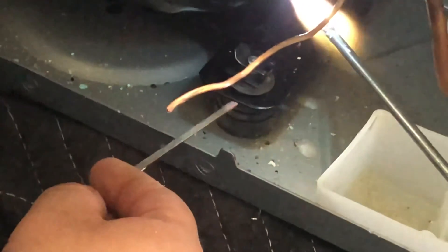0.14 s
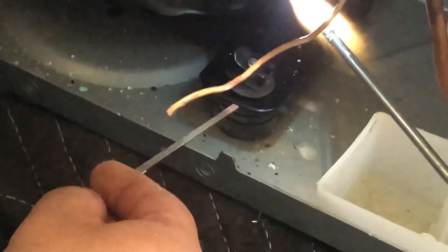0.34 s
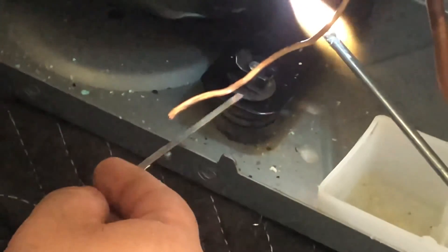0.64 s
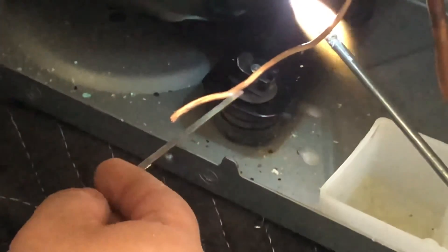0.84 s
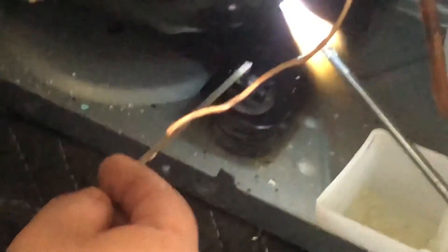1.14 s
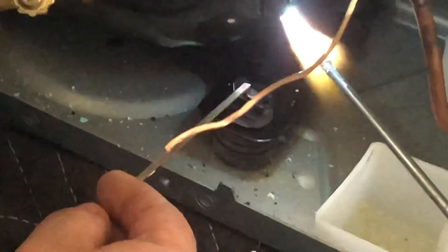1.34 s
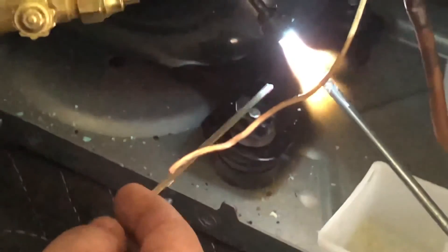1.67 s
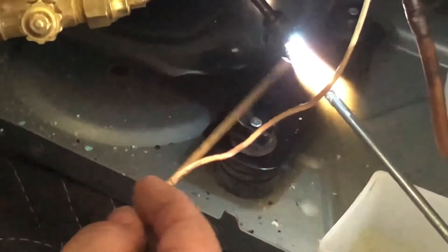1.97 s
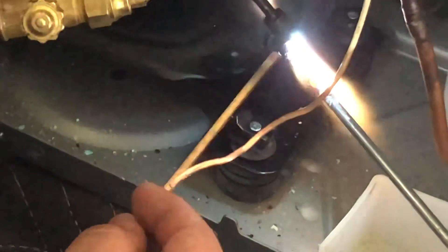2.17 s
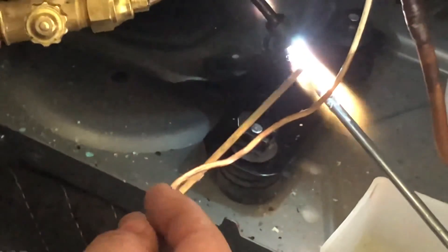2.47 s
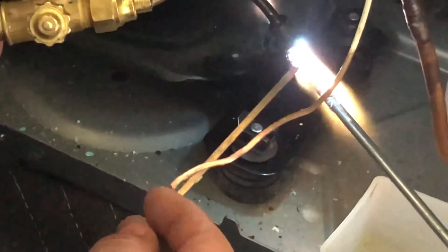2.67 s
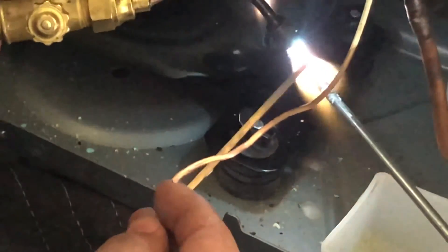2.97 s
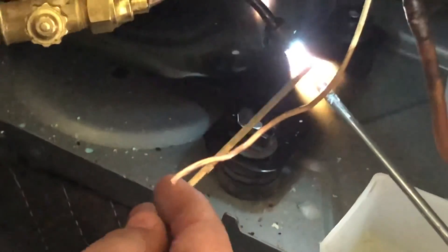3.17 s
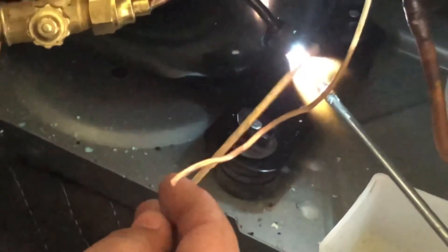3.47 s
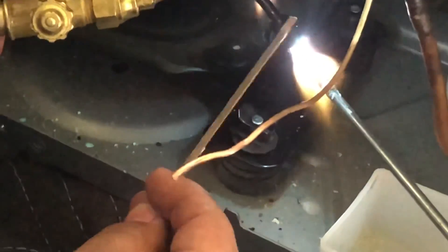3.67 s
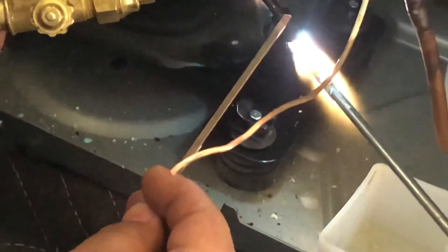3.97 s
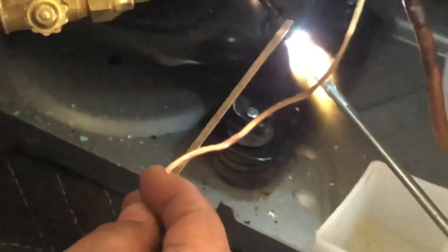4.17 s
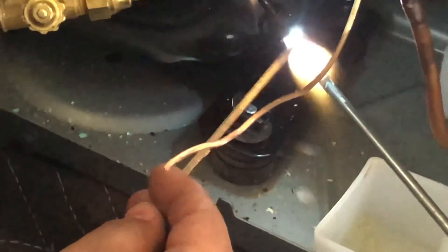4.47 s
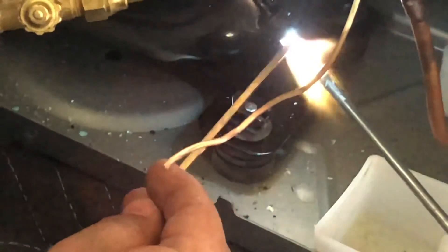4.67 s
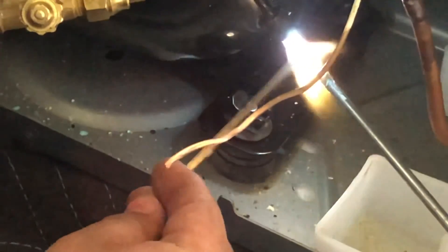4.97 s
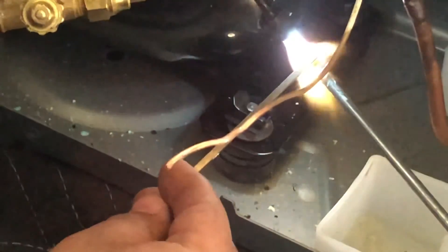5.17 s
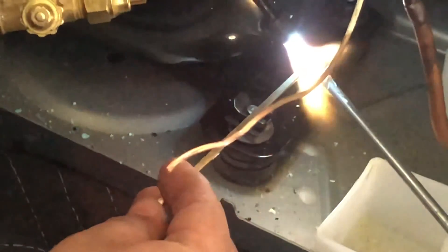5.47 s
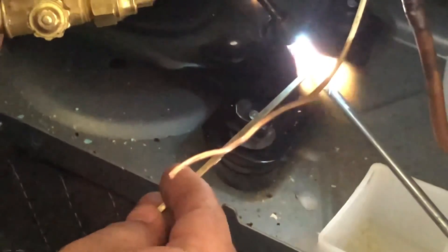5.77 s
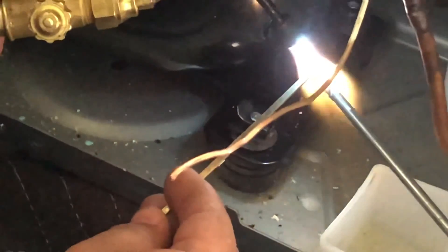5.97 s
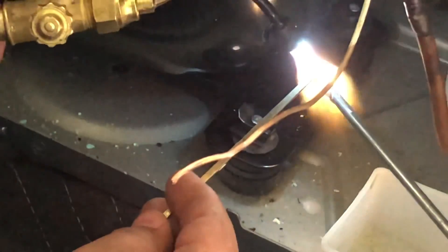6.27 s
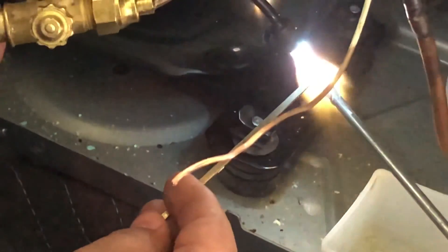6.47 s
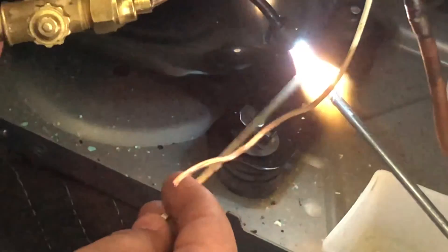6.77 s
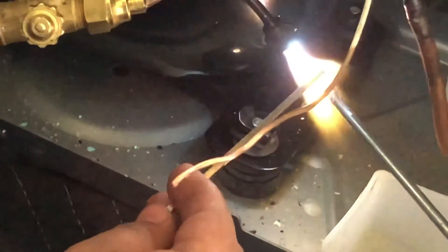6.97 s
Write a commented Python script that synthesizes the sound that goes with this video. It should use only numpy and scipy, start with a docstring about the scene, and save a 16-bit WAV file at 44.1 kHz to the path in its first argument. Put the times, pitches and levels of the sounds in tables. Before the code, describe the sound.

Close, steady rush of a gas torch inside a metal compartment, with a bright hiss that swells and shifts colour midway.

```python
"""Brazing torch in a steel compartment

A torch burns steadily inside a cooling unit, close up. The turbulent flame roars and rushes
through the compartment's resonances, and its gas jet hisses above them. The hiss flares and
changes colour as the flame is brought onto a copper pipe joint and a rod is fed into it."""
import sys
import numpy as np
from scipy import signal
from scipy.fft import rfft, irfft, next_fast_len
from scipy.io import wavfile

SR = 44100
rng = np.random.default_rng(int(sys.argv[2]) if len(sys.argv) > 2 else 0)


def generate_wav(signal):
    """Clip the signal to [-1, 1] and save it as 16-bit WAV at the path in sys.argv[1]."""
    frames = np.transpose(np.atleast_2d(signal))
    scaled = np.clip(frames, -1, 1) * 32767
    pcm = np.round(scaled).astype(np.int16)
    wavfile.write(sys.argv[1], SR, pcm)


N = 313551
FRAME, HOP = 2048, 512
SAMPLE_TIMES = np.arange(N) / SR
FRAME_TIMES = np.arange(N // HOP + 9) * HOP / SR
HZ = np.fft.rfftfreq(FRAME, 1 / SR)
TOP_HZ = 15780


def amp(db):
    """Decibels to gain."""
    return 10 ** (np.asarray(db) / 20)


def unit_rms(x):
    """Scales to rms 1."""
    return x / np.sqrt(np.mean(x ** 2) + 1e-20)


def follow(rows, times):
    """Each column of an automation curve, read at the given times."""
    seconds, *columns = np.transpose(rows)
    return [np.interp(times, seconds, column) for column in columns]


def wander(rate_hz, size):
    """Random drift of rms 1 across the scene, mostly slower than rate_hz."""
    padded = next_fast_len(size)
    hz = np.fft.rfftfreq(padded, N / SR / size)
    spectrum = rfft(rng.standard_normal(padded)) * (hz > 0) / (1 + (hz / rate_hz) ** 2)
    return unit_rms(irfft(spectrum, padded)[:size])


def resonances(modes):
    """Power spectrum of a set of steep-sided peaks."""
    return sum(amp(db) ** 2 / (1 + (2 * (HZ - hz) / width) ** 2) ** 2 for hz, width, db in modes)


def above(edge_hz, order):
    """Share of the power that a smooth high-pass lets through."""
    rise = (HZ / edge_hz + 1e-4) ** order
    return rise / (1 + rise)


def turbulence(power):
    """Noise of rms 1, coloured by a steady or frame-by-frame power spectrum."""
    real, imaginary = rng.standard_normal((2, len(FRAME_TIMES), len(HZ)))
    spectra = (real + 1j * imaginary) * np.sqrt(power / power.sum(-1, keepdims=True))
    _, noise = signal.istft(spectra.T, nperseg=FRAME, noverlap=FRAME - HOP)
    return unit_rms(noise[:N])


def comb(delay_s):
    """Ripple that a faint echo lays over the spectrum, one delay per frame."""
    return np.cos(np.outer(2 * np.pi * delay_s, HZ).astype(np.float32))


def wall_scatter(strength, shortest_s, longest_s, sway_s, sway_hz, count):
    """Power gain from many faint echoes off sheet metal, wavering as the hand sways the torch."""
    delays = np.linspace(shortest_s, longest_s, count) * rng.uniform(.9, 1.1, count)
    ripple = sum(comb(delay + sway_s * wander(sway_hz, size=len(FRAME_TIMES))) for delay in delays)
    return np.exp(2 * strength * ripple)


# Low resonances of compartment and bench. Each row: pitch in Hz, width in Hz, level in dB.
ROAR_MODES = [(79, 24, -11.5), (126, 33, -12), (183.7, 57, -2.7), (239.6, 51, -3), (307, 120, -13.5),
              (381.5, 32, -9.5), (449.7, 15.8, 0.0), (526.4, 45, -3), (621, 47, -8.5), (735, 116, -3.5),
              (798, 62, -6), (883, 99, -3), (1010.5, 26, -0.5), (1029, 128, -4), (1170, 44, -12.4),
              (1262, 35, -3), (1440, 166, -8.5), (1492, 86, -5), (1610, 42, -15)]
# How hard the flame burns. Each row: time in seconds, roar level in dB.
ROAR_LEVELS = [(0.0, -32.5), (2.89, -32), (3.66, -35.5), (3.95, -32), (4.67, -34.0), (6.32, -33),
               (6.54, -34.5), (7.1, -32.5)]


def roar(flutter_db=0.42):
    """Uneven burning in the flame booms in the compartment."""
    burn_db, = follow(ROAR_LEVELS, SAMPLE_TIMES)
    colour = resonances(ROAR_MODES) * above(60, order=10) * (1 - above(1600, order=40))
    return amp(burn_db + flutter_db * wander(27, size=N)) * turbulence(colour)


# Where the flame plays. Each row: time in seconds, share on the joint from 0 to 1,
# share of the remainder on the rod from 0 to 1.
FLAME_AIM = [(0.9, .02, .02), (1.38, 0, 0.2), (2.15, 0.13, 0.3), (2.97, 0, 0.6), (3.3, 0.6, .3),
             (3.6, 0.9, .3), (4.35, 0.77, .43), (4.76, 0.8, 0.7), (5.05, 0.14, 0.63), (5.95, 0, 0.92),
             (6.5, 0.34, 0.9), (7.1, 0.4, 0.5)]


def aim():
    """The flame's shares on the joint, on the rod and blowing free, frame by frame."""
    joint, rod = np.clip(follow(FLAME_AIM, FRAME_TIMES), 0, 1)[:, :, None]
    return joint, (1 - joint) * rod, (1 - joint) * (1 - rod)


# Midrange resonances that carry the rush. Each row: pitch in Hz, width in Hz, level in dB.
RUSH_MODES = [(1710, 180, -7.5), (1782, 97, -7.5), (1972, 115, -7.5), (2067, 143, -5.5), (2130, 46, -3.5),
              (2233, 230, -5), (2482, 150, -1), (2583, 36, -4), (2670, 280, -2.5), (3013, 176, 0),
              (3250, 106, -4), (3395, 150, -8.5), (3515, 41, -5), (3616, 160, -7), (4044, 420, -5.5)]
# The rush rides on the speed of the gases. Each row: time in seconds, level in dB.
RUSH_LEVELS = [(0.05, -25), (2.89, -23.5), (5.18, -24), (5.31, -25), (7.05, -24.5)]


def rush(eddies, eddy_db=0.52, free_db=3.4, blocked_db=-1.4, body_hz=2000):
    """The flame's fast core rings between the steel walls; its body thins where metal blocks it."""
    rush_db, = follow(RUSH_LEVELS, SAMPLE_TIMES)
    _, _, free = aim()
    body_db = (free * free_db + (1 - free) * blocked_db) * (1 - above(body_hz, order=16))
    band = above(1400, order=24) * (1 - above(4140, order=60))
    colour = resonances(RUSH_MODES) * band * amp(body_db) ** 2
    walls = wall_scatter(0.12, shortest_s=.004, longest_s=.022, sway_s=.00007, sway_hz=0.59, count=7)
    return amp(rush_db + eddy_db * eddies) * turbulence(colour * walls)


# The torch moves in toward the back wall. Each row: time in seconds, extra path of the echo in cm.
WALL_PATH = [(0.67, 39.0), (1.84, 41), (2.06, 38), (2.88, 30), (3.16, 37.2), (5.3, 34.6), (5.5, 30),
             (6.3, 35)]


def near_echoes(wall_echo=0.036, tray_echo=0.081, rod_echo=0.34, feed_s=4.95, feed_fade_s=1.7):
    """Power gain from echoes off wall, tray and rod: combs that slide as torch and rod move."""
    sound_cm_per_s = 34300
    wall_cm, = follow(WALL_PATH, FRAME_TIMES)
    wall_delay = wall_cm / sound_cm_per_s
    tray_delay = 0.657 * wall_delay  # the tray below is nearer than the wall
    since_feed = FRAME_TIMES - feed_s
    rod_cm = 16.4 + 1.11 * since_feed  # the path grows steadily as the rod is fed
    _, on_rod, _ = aim()
    # the rod's echo is strongest around its entry into the flame
    rod_gain = rod_echo * on_rod * np.exp(-abs(since_feed) / feed_fade_s)[:, None]
    ripple = wall_echo * comb(wall_delay) + tray_echo * comb(tray_delay)
    ripple += rod_gain * comb(rod_cm / sound_cm_per_s)
    return np.exp(2 * ripple)


# Three colours of hiss: the jet blowing past the pipe, square on the joint, and on the rod.
# Each row: centre of a peak in Hz, width in Hz, level in dB.
FREE_JET = [(4434, 460, 1.5), (5240, 790, -3.5), (5600, 414, -10.5), (5930, 260, -3), (6280, 130, -4.5),
            (6990, 670, -3), (7550, 266, -6.5), (8450, 1200, -4.5), (9420, 910, -6.5), (10220, 840, -7),
            (11440, 1200, -11.5), (13100, 930, -10.5), (13500, 914, -7), (15459, 2372, -12.5)]
JET_ON_JOINT = [(4420, 590, -4.5), (5110, 920, -5.3), (5380, 170, -3), (5660, 329, -12.5),
                (6356, 250, -1.5), (7360, 450, -5), (8160, 285, -8), (8380, 541, -10), (9530, 546, 0),
                (10740, 605, -6.5), (11600, 2000, -8.5), (12660, 1100, 0.5), (13941, 853, -2),
                (14500, 1100, 0), (15402, 539, -6.9)]
JET_ON_ROD = [(4484, 430, 1), (5300, 200, -6), (5620, 310, -4), (6270, 78, -9), (6530, 900, -6.5),
              (7260, 470, -3), (8570, 950, -2.5), (9400, 450, -7.5), (10430, 530, -3.5), (11580, 1500, 1),
              (12662, 1171, 0.5), (13700, 511, 2), (14067, 761, -0.5), (15349, 1944, 0)]
# Flares as gas strikes metal. Each row: time in seconds, hiss level in dB, fine fizz level in dB.
HISS_LEVELS = [(0.0, -24.1, -28.0), (1.34, -24.5, -23.5), (1.67, -24.5, -24.5), (1.73, -26.7, -25.5),
               (2.09, -22.2, -23), (2.17, -25.5, -25.5), (3.01, -23, -25.4), (3.06, -25, -21.5),
               (3.23, -23, -25), (3.34, -21, -18.5), (3.49, -21.5, -21.9), (3.56, -18.8, -18),
               (3.84, -22.0, -23.5), (4.23, -19.2, -17.5), (4.45, -21, -21.5), (5.04, -21.5, -23),
               (5.29, -24.0, -26.5), (5.39, -23.6, -23.2), (5.94, -21.5, -26), (5.99, -22.3, -23),
               (6.65, -22, -22.5), (7.1, -26, -26.2)]


def hiss(eddies, hiss_eddy_db=0.65, fizz_eddy_db=0.7, fizz_from_hz=11000):
    """The jet breaks on pipe and rod; what it strikes sets its colour."""
    jets = (JET_ON_JOINT, JET_ON_ROD, FREE_JET)
    colour = sum(share * unit_rms(resonances(peaks)) for share, peaks in zip(aim(), jets))
    band = above(4280, order=60) * (HZ < TOP_HZ)
    walls = wall_scatter(.072, shortest_s=.0007, longest_s=.007, sway_s=.00005, sway_hz=.5, count=22)
    colour = colour * band * near_echoes() * walls
    # the fine fizz flares more than the hiss below it
    fizz_band = above(fizz_from_hz, order=30)
    hiss_db, fizz_db = follow(HISS_LEVELS, SAMPLE_TIMES)
    coarse = amp(hiss_db + hiss_eddy_db * eddies) * turbulence(colour * (1 - fizz_band))
    fizz = amp(fizz_db + fizz_eddy_db * eddies) * turbulence(colour * fizz_band)
    return coarse + fizz


def scene():
    """One flame, dead ahead; the same eddies shake its rush and its hiss."""
    eddies = wander(37, size=N)
    flame = roar() + rush(eddies) + hiss(eddies)
    return np.array([flame, flame])


def record(dry):
    """A steep low-pass trims the very top of the fizz."""
    low_pass = signal.firwin(801, TOP_HZ, window=("kaiser", 9), fs=SR)
    return signal.oaconvolve(dry, low_pass[None], "same")


dry = scene()
out = record(dry)
generate_wav(out)
```